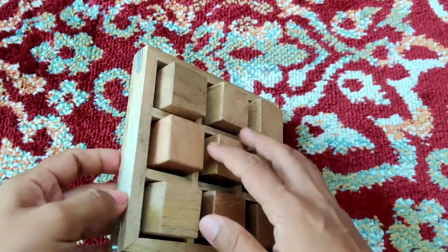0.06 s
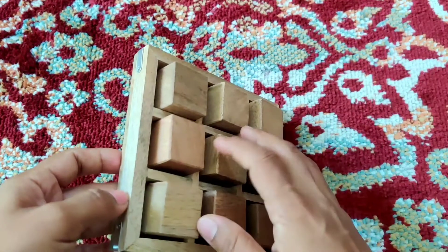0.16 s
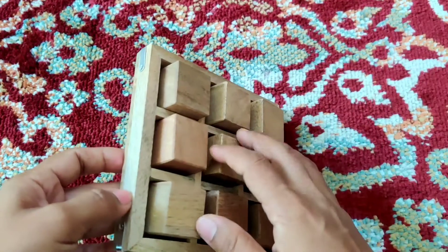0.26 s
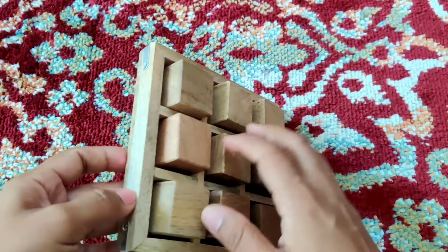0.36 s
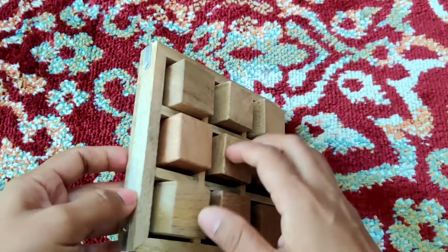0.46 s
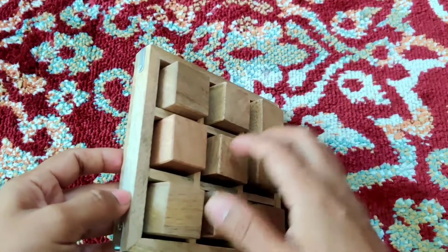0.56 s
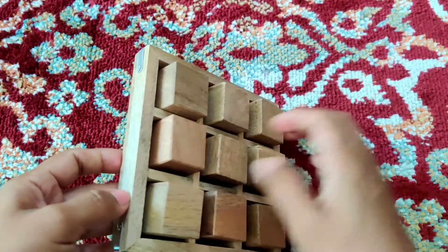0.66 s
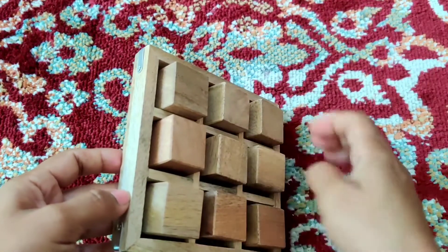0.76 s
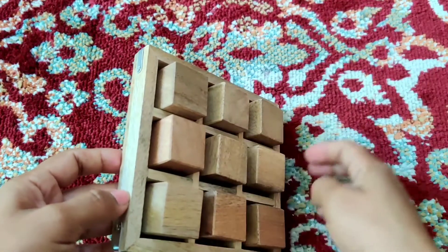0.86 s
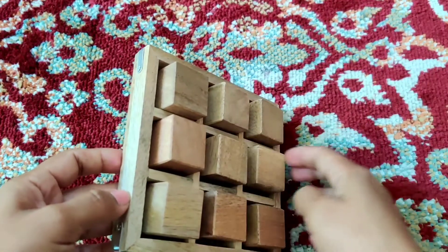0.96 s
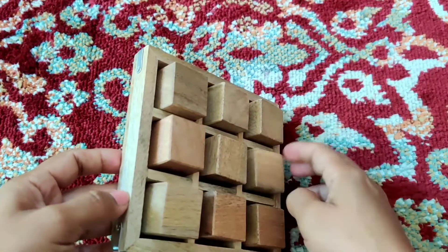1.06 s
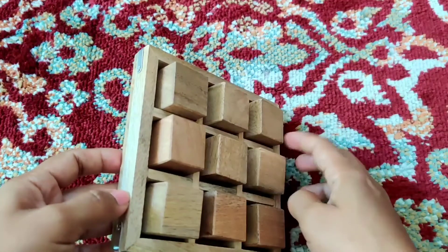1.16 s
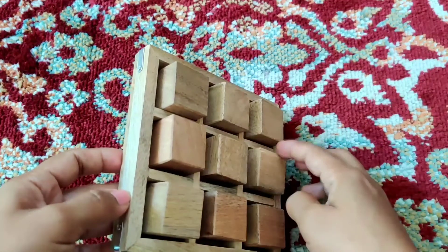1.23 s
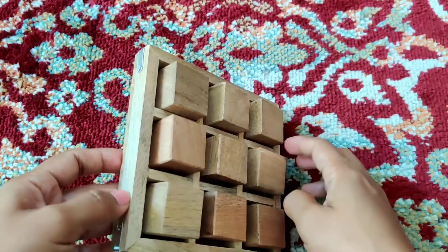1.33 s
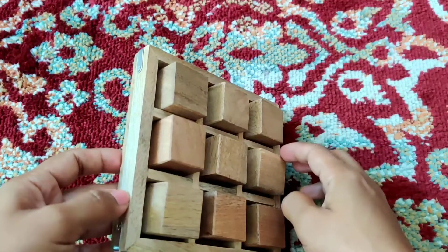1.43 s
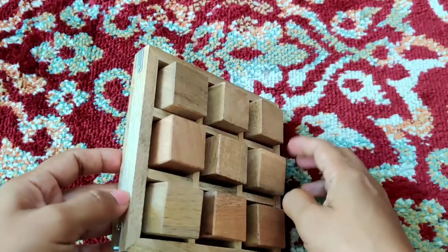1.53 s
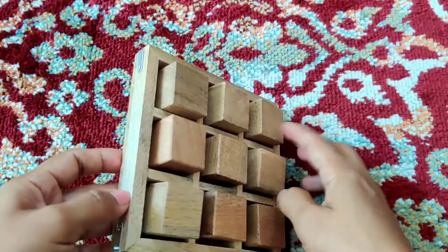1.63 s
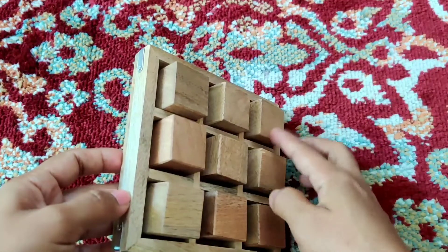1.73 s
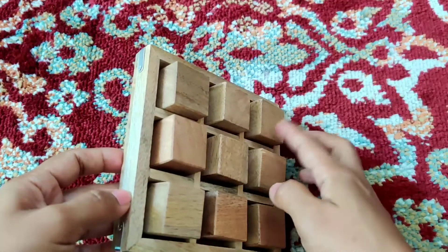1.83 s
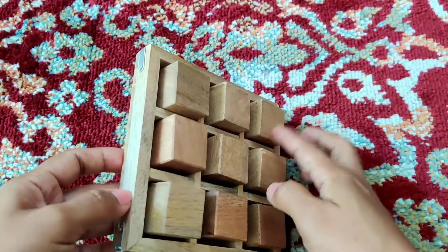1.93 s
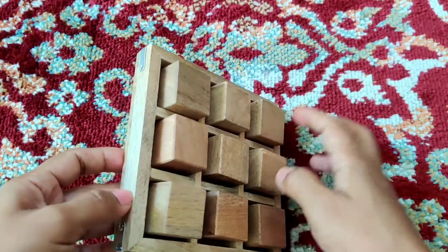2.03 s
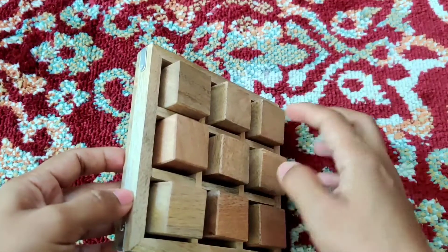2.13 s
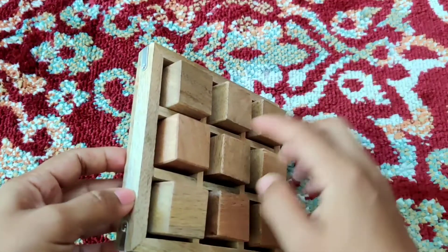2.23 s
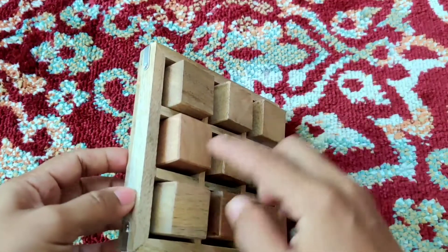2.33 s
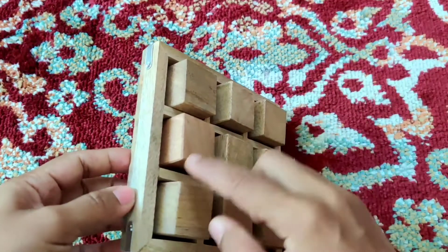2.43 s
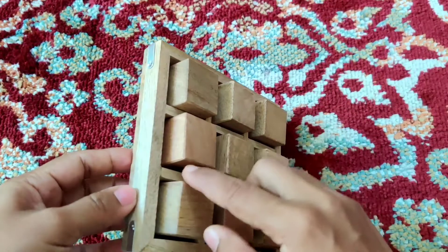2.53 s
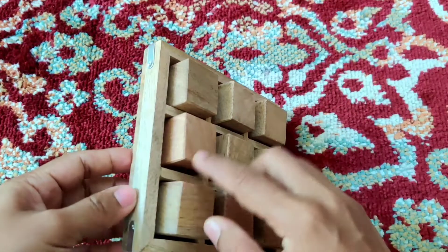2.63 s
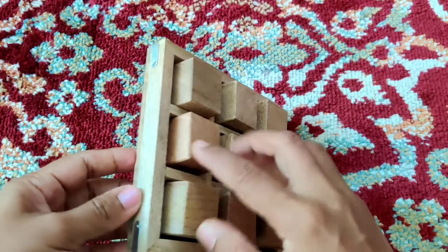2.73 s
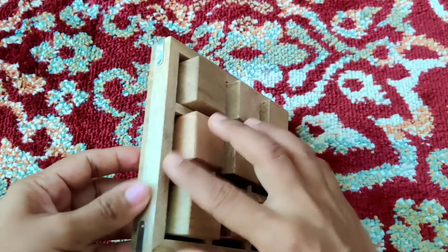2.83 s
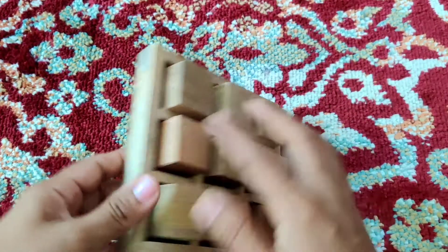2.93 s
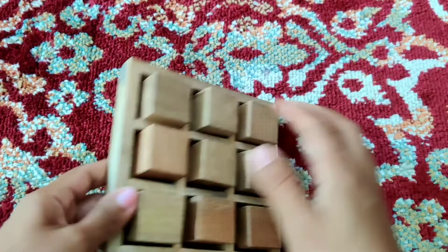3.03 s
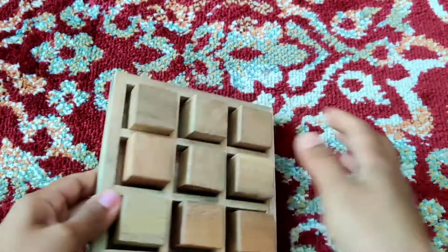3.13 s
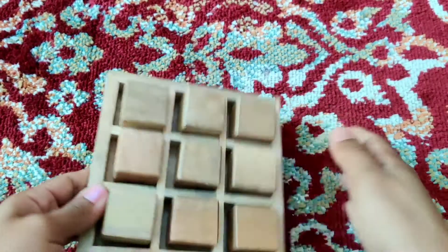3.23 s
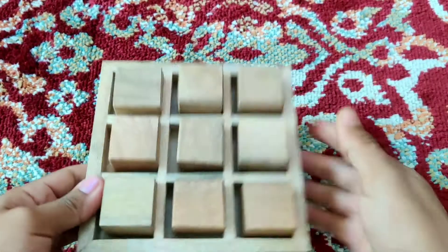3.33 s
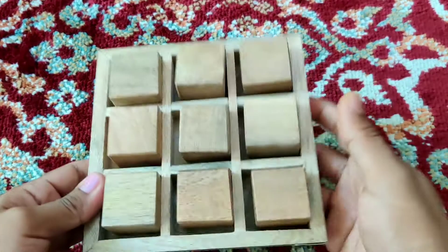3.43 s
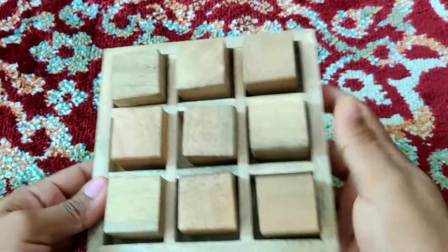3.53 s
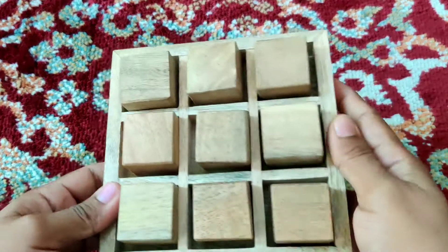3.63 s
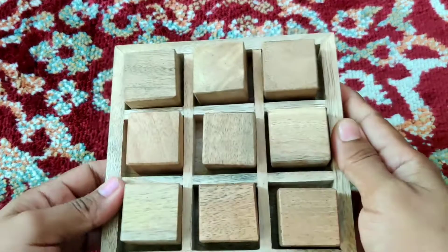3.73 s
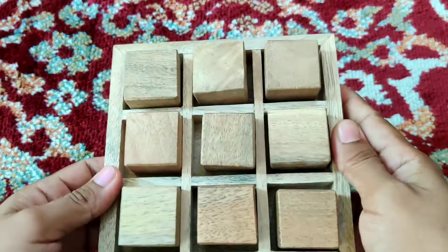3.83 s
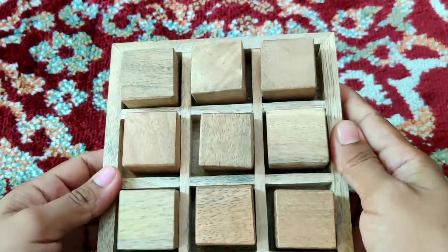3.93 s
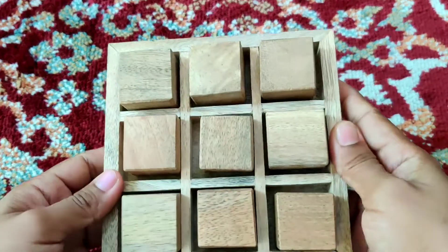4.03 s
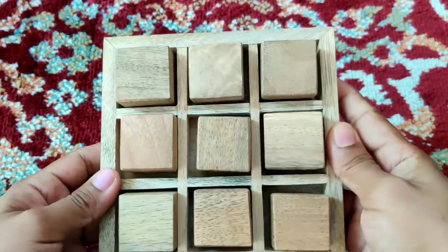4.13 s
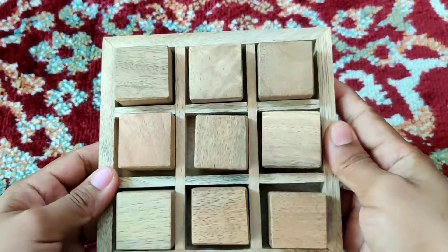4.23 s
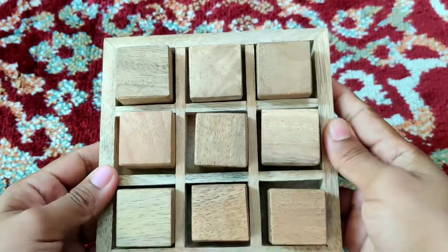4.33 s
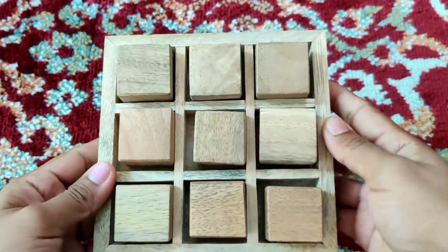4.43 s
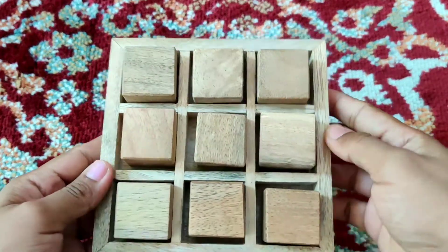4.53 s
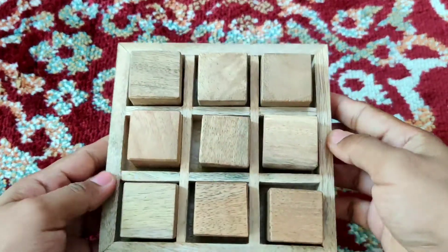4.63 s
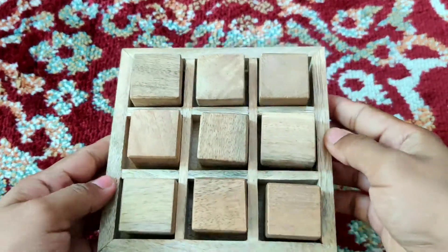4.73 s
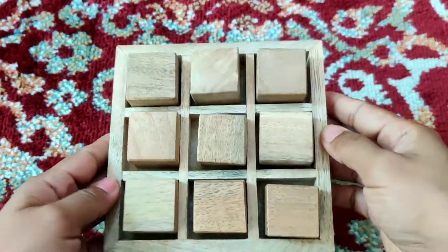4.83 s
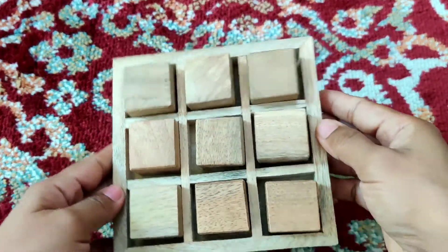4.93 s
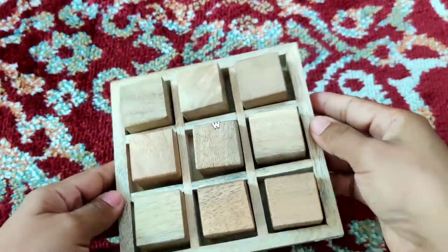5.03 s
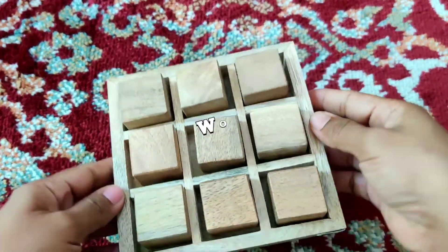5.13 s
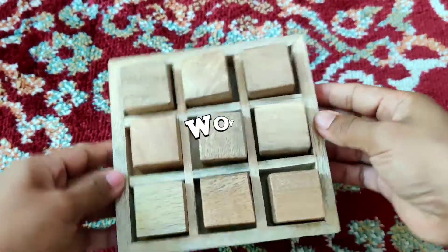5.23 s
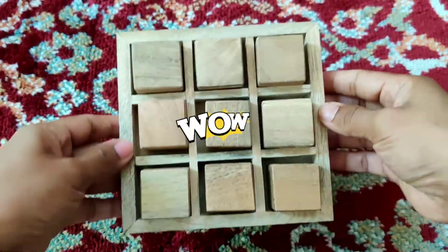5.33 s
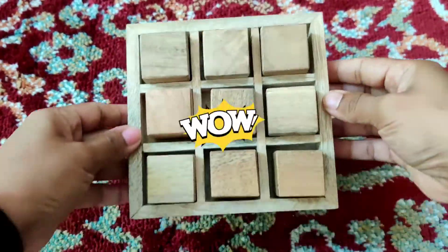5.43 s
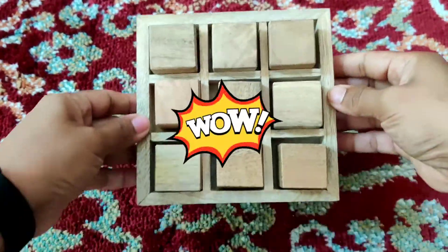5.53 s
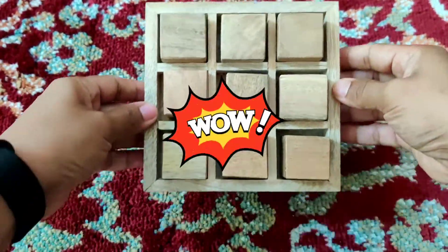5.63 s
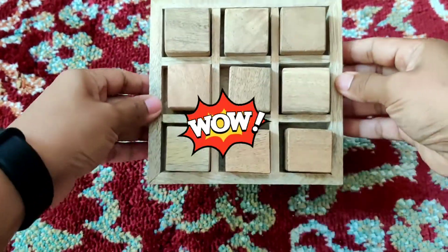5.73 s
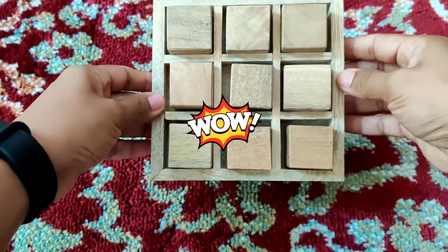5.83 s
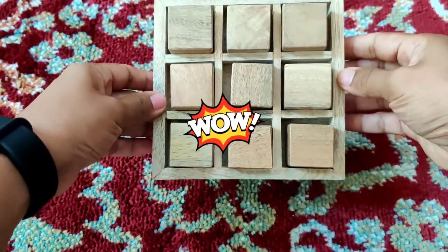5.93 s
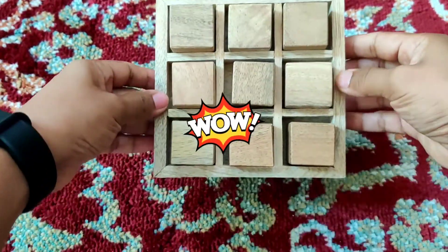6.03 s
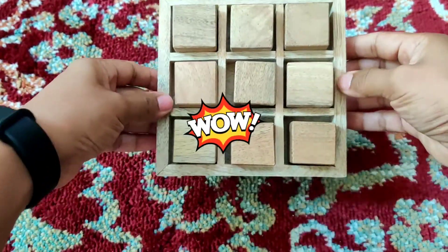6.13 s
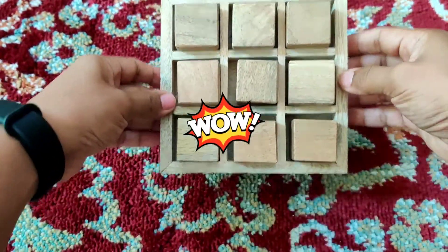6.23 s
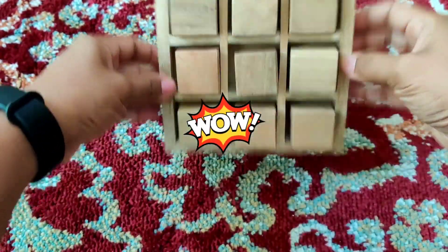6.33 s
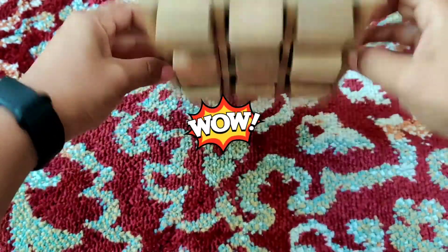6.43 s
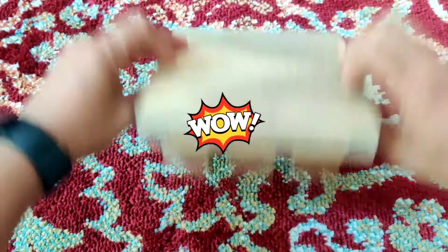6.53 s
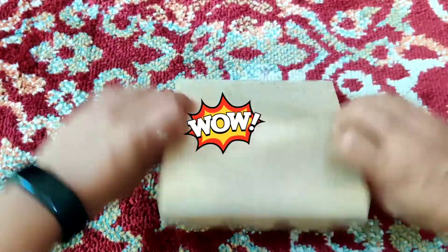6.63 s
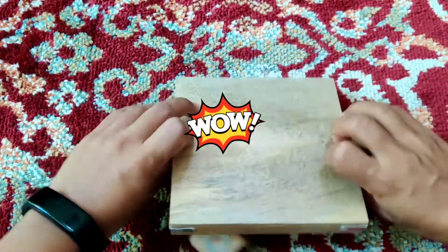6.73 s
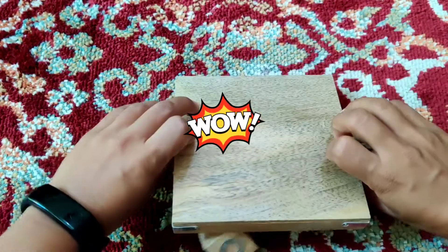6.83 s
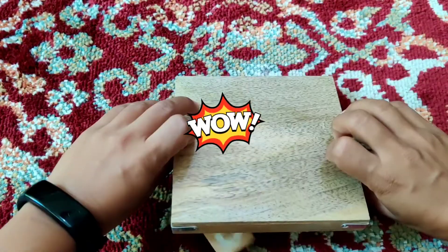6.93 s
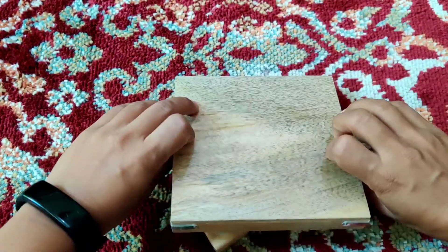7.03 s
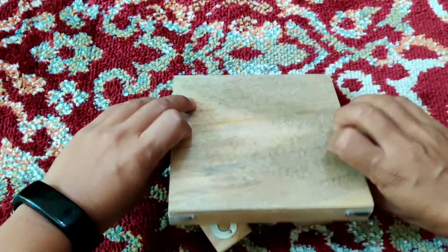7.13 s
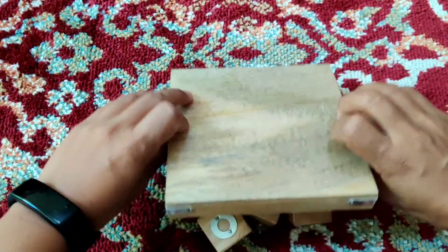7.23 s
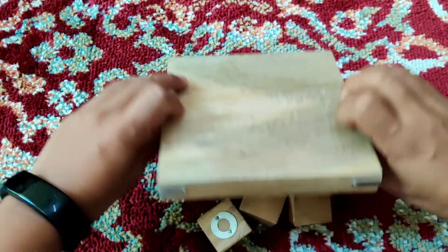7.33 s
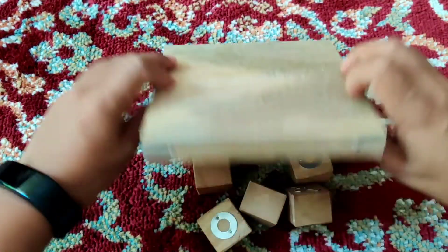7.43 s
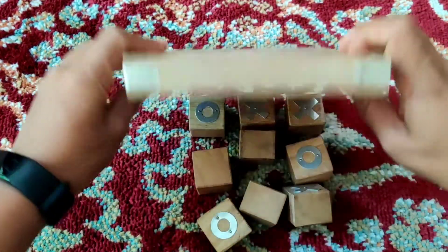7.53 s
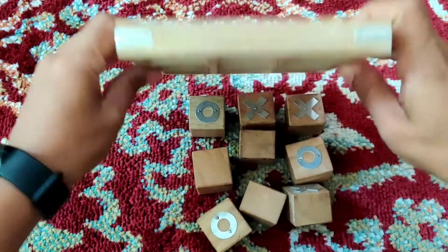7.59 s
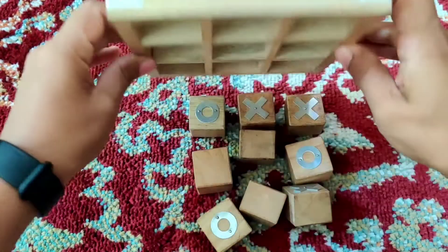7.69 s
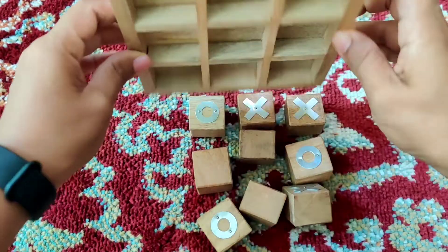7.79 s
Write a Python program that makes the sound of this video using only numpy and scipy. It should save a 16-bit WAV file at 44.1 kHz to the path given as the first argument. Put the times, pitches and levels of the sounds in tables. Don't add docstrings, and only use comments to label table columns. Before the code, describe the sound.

Close view of a wooden tray of loose cubes on carpet in a small humming room. Sparse finger taps and skin rubs come first, then the lifted tray makes a burst of dry clacks. Softer clicks follow as it rocks, then one sharp knock. After a pause it is tipped and turned over, with a loud hollow clatter that quickly dies to small ticks.

```python
import sys
import numpy as np
from scipy import signal
from scipy.fft import rfft, irfft, next_fast_len
from scipy.io import wavfile
from scipy.ndimage import uniform_filter1d

SR = 44100
rng = np.random.default_rng(int(sys.argv[2]) if len(sys.argv) > 2 else 0)


def linear_from_db(decibels):
    return 10 ** (np.asarray(decibels, float) / 20)


def wrap_up_sound(samples):
    columns = np.atleast_2d(samples).T
    tamed = np.clip(columns, -1, 1)
    steps = np.round(tamed * 32767).astype(np.int16)
    wavfile.write(sys.argv[1], SR, steps)


N = 346581
M = next_fast_len(N + 4096)
HZ = np.fft.rfftfreq(M, 1 / SR)
HELD_FROM_S, UPRIGHT_FROM_S, CAVITY_FROM_S, DRUM_FROM_S = 3.3, 5.9, 6.6, 6.7
MID_KNOCK_HZ, MID_KNOCK_DB = 1500, -45


def on_log(points, hz):
    f, v = np.transpose(points)
    return np.interp(np.log(np.maximum(hz, 1)), np.log(f), v)


def level(x, db):
    return x * linear_from_db(db) / np.sqrt(np.mean(x ** 2))


def coloured(x, gain):
    return irfft(rfft(x, M) * gain, M)[..., :N]


def causal(db):
    size = 2048
    cepstrum = irfft(np.interp(np.fft.rfftfreq(size, 1 / SR), HZ, db) * np.log(10) / 20)
    cepstrum[1:size // 2] *= 2
    cepstrum[size // 2 + 1:] = 0
    return rfft(irfft(np.exp(rfft(cepstrum))), M)


def walk(rate_hz):
    hold = int(SR / rate_hz)
    steps = np.repeat(rng.standard_normal(N // hold + 1), hold)
    return uniform_filter1d(steps, hold)[:N]


def two_ports(mid, side, alike):
    return np.sqrt(1 + alike) * mid + np.sqrt(1 - alike) * side * np.array([[1], [-1]])


# Hz, dB per Hz.
AIR = [(15, -43), (28, -12), (55, -15.5), (90, -10), (200, -11.5), (330, -14.5), (450, -16), (1000, -19.5),
       (2000, -26.5), (4000, -35.5), (5500, -41.5), (6700, -39), (8500, -47), (15500, -43.5)]
# Hz, width in Hz, level in dB.
HUM = [(189.3, 24, -73.5), (272.3, 43, -72.5)]
# Hz, share 0-1.
AIR_ALIKE = [(40, .88), (130, .94), (290, .8), (640, .5), (1400, .02)]


def air():
    mid, side = rfft(rng.standard_normal((2, M)))
    pair = two_ports(mid, side, on_log(AIR_ALIKE, HZ))
    out = level(irfft(pair * linear_from_db(on_log(AIR, HZ)), M)[:, :N], -67)
    for hz, width_hz, db in HUM:
        band = 1 / (1 + ((HZ - hz) / width_hz * 2) ** 2)
        out = out + level(irfft(pair * band, M)[:, :N], db) * linear_from_db(1.3 * walk(10))
    return out


# start in seconds, knock in dB, knock pitch in Hz,
# hardness in dB (cube ring over the knock), at times tick over the knock in dB; so to TURN.
TAPS = [(.0025, -54, 1480, -22, -19.5), (.009, -58, 1480, -22, -20), (.0055, -54.5, 2160, -13, -20.5),
        (.0168, -63, 2530, 8, 13), (.5845, -55.5, 2030, -18, -15), (.5833, -49, 1400, -26, -19.5),
        (1.1, -39.5, 1456, -22, -17), (1.1107, -44, 1510, -20, -12), (1.1961, -38.5, 2314, 9.5, 9),
        (1.1966, -41, 1454, -14, -13), (1.2088, -37.5, 1540, 7.5, 7.5), (1.209, -51, 2310, -18, 5),
        (1.2203, -51, 1610, 5, -14), (1.2268, -46, 1480, -37, -30), (3.2375, -44.5, 1570, -20, -11)]
# start in seconds, tick in dB, knock in dB.
NAILS = [(.179, -61.5, -62), (0.5768, -53, -58), (0.739, -53, -68), (1.744, -54, -67), (1.815, -62, -74),
         (1.983, -53.5, -75), (1.9934, -45.5, -60.5), (2.7389, -51.5, -62), (3.6333, -53, -47),
         (3.6456, -51, -45), (3.699, -58, -53), (3.7367, -57, -51.5), (3.74, -54, -58), (3.984, -54.5, -74),
         (4.746, -55, -76), (5.0163, -60, -52), (5.392, -76, -58), (5.7411, -58, -60), (7.7431, -60, -73),
         (7.7546, -60.5, -71)]
TILT = [(3.4391, -57.5, 1200, -3.5), (3.451, -52, 1200, -9), (3.4712, -53, 1160, -32),
        (3.4887, -41.5, 1410, -21), (3.4928, -39, 1700, -20), (3.498, -40, 1730, -22),
        (3.505, -34.5, 1690, -9, -20), (3.5125, -34.5, 1740, -9, -18), (3.5169, -40, 1350, -14, -26),
        (3.52, -41, 1900, -16, -26), (3.5252, -43, 1500, -20), (3.5295, -39, 1400, -12, -25),
        (3.5268, -33, 1425, -9), (3.5325, -45, 850, -28), (3.537, -44, 1300, -20), (3.5415, -46, 1800, -20),
        (3.5496, -61, 850, -21), (3.5994, -39.5, 1790, -14), (3.605, -36, 1680, -25),
        (3.6092, -52, 1690, -3), (3.618, -46, 1760, -22), (3.6287, -44.5, 780, -24),
        (3.6393, -45, 1280, -19), (3.6483, -44, 1490, -10), (3.6534, -40, 1630, -16),
        (3.6608, -47, 1880, -23), (3.6818, -55, 830, -21), (3.6891, -51.5, 990, -7), (3.705, -55, 1400, -9),
        (3.7123, -48, 1130, -20), (3.801, -63, 700, -19.5), (3.813, -53, 696, -16.5),
        (3.822, -57, 735, -17)]
SWAY = [(3.9905, -45, 850, -30), (3.9535, -51, 850, -30), (3.954, -52, 1750, -20), (3.966, -52, 860, -30),
        (3.9665, -49, 1270, -30), (3.996, -52, 1800, -10), (4.0575, -54, 2020, -8), (4.063, -55, 1000, -20),
        (3.9321, -42.5, 1280, -16), (3.937, -42, 1910, -30), (3.942, -48, 1700, -16),
        (3.953, -48, 1280, -14), (3.9657, -52, 1800, -20), (3.99, -42, 1790, -4.5), (4.058, -48, 1060, -12),
        (4.18, -57, 1220, -31), (4.1873, -55.5, 1170, -24), (4.1959, -48.5, 1300, -22),
        (4.2649, -49, 860, -14), (4.2709, -51, 1180, -19), (4.2815, -58, 910, -25), (4.2999, -27, 1700, -6),
        (4.3025, -44, 2120, -16), (4.3113, -56.5, 1510, -4.5), (4.9262, -45, 1850, -18),
        (4.9265, -47, 960, -28), (4.9331, -47.5, 1890, -19), (4.9335, -47, 1000, -28),
        (4.942, -46, 2150, -14), (4.9425, -48, 900, -28), (4.9435, -50, 1500, -20), (4.953, -51, 850, -28),
        (5.011, -53, 800, -28), (5.029, -55, 850, -28), (5.1445, -49, 1050, -24), (5.152, -52, 880, -28),
        (5.0107, -48.5, 1800, -10), (5.0238, -46, 1950, -15), (5.097, -56, 1240, -20),
        (5.1225, -55, 1000, -22), (5.1351, -54, 1000, -15), (5.1441, -44.5, 1950, -14)]
LIFT = [(5.3632, -45, 1780, -26), (5.3698, -52, 850, -14), (5.3741, -47, 1750, -24),
        (5.3805, -49.5, 910, -23), (5.385, -55, 900, -27), (5.4015, -51, 1700, -20),
        (5.4037, -48, 1790, -18), (5.4062, -47.5, 1500, -10), (5.4103, -46.5, 1200, -4),
        (5.4135, -63, 1700, 2), (5.4252, -54, 2030, -8), (5.439, -57, 1900, -20), (5.4423, -53, 1180, -16),
        (5.4445, -51, 1300, -8)]
DROP = [(5.4767, -29, 1970, -2, -12), (5.4787, -24, 1706, -3, -13), (5.479, -31, 2150, -3, -10),
        (5.4895, -39, 2150, -7, -16), (5.4865, -34, 1740, -5.5), (5.4925, -38, 1900, -6),
        (5.4975, -44, 2060, -6), (5.502, -42, 1560, -11), (5.5093, -42, 2150, -5)]
TIP = [(6.0102, -44, 2170, -3.5), (6.0165, -44.5, 2150, -2.5), (6.0226, -52.5, 1100, -14),
       (6.3953, -56, 1820, -12.5), (6.4008, -54, 1900, -14), (6.4062, -48, 2210, -12.5),
       (6.39, -58, 1850, -20), (6.4105, -56, 1800, -20), (6.4143, -52.5, 1840, -14),
       (6.4188, -39, 2160, -8), (6.4262, -48, 2460, 1.5), (6.4299, -40, 2080, -10.5),
       (6.4328, -40.5, 2300, -8.5), (6.4388, -36, 1980, -3.5), (6.4418, -47, 2300, -12),
       (6.4455, -49, 1702, -14), (6.4495, -51, 1400, -16), (6.457, -52.5, 2230, -12)]
TURN = [(6.7062, -30.5, 1486, -16, -17), (6.7085, -44, 2120, -10, -16), (6.7105, -40, 1500, -14, -25),
        (6.7145, -43, 1350, -16, -30), (6.722, -48, 620, 3, 4), (6.729, -46.5, 620, 2, 4),
        (6.7406, -11.5, 1312, -14), (6.742, -17.5, 1340, -1), (6.7446, -12, 2250, -8, -12),
        (6.7465, -30, 2300, 11, 4), (6.7538, -11.5, 1306, -14), (6.7555, -18, 1340, -4, -12),
        (6.7574, -11.5, 2256, -8, -12), (6.7597, -30, 2300, 13, 5), (6.7618, -19, 1400, -4, -16),
        (6.7645, -21, 1500, -4, -14), (6.7661, -16.5, 1395, -9, -18), (6.7665, -22, 2200, -6, -18),
        (6.7705, -21, 1450, -8, -20), (6.7845, -24, 1150, -10, -24), (6.7872, -22.5, 1200, -19),
        (6.794, -46, 2300, 13, -4), (6.8025, -48, 2300, 14, -4), (6.809, -38, 2210, -1, -8),
        (6.849, -40, 700, -8, -20), (6.8568, -36, 1470, -6, -12), (6.8628, -33, 1500, -8, -12),
        (6.911, -52, 1400, 3, -8), (7.019, -51, 1380, -1, -8)]
# start in seconds, knock in dB.
BOUNCES = [(6.7767, -17.5), (6.7906, -13), (6.7998, -15), (6.8078, -23.5), (6.8135, -25.5), (6.8171, -25.5),
           (6.8232, -18), (6.8286, -24.5), (6.8365, -28), (6.8445, -28), (6.8395, -32), (6.876, -36),
           (6.882, -37), (6.891, -39), (6.903, -39), (6.926, -42), (6.945, -45), (6.97, -46), (7.012, -51),
           (7.025, -49), (7.0602, -47.5), (7.0794, -51.5), (7.236, -53.5), (7.247, -58), (7.268, -53.5),
           (7.319, -60.5)]
VOICE = {"nail": (-2.9, .95, 0.1, 0, 0), "tap": (-54, -1.6, 19, -0.5, 0.79),
         "tilt": (-4, 0.83, 1.5, 5, 3.5), "sway": (-12, 0, 9, -13.5, 1), "lift": (-13, 0, 10, -2.5, 2.8),
         "drop": (-21, 0.33, 0, -4, 3), "tip": (-16, 0.8, 0.5, -9.5, 1.2),
         "turn": (-21, 1.1863, 3, -5.5, 2.4), "bounce": (-17.5, 0.7936, -1.3, -13.5, 0.9)}
FRAME_DB = {"nail": -19, "tap": -31, "tilt": -17.5, "sway": -22, "lift": -18, "drop": -3.5, "tip": -30,
            "turn": -31.5, "bounce": -39.5}


def contacts():
    hits = []
    for s, tick_db, db in NAILS:
        hits.append((s, db + VOICE["nail"][0], FRAME_DB["nail"], 1300, db, tick_db - 13, tick_db))
    bounces = []
    for s, db in BOUNCES:
        hz = min(1305 + 1500 * (s - BOUNCES[0][0]), 1430)
        bounces.append((s, db, hz, -20.5))
    handlings = {"tap": TAPS, "tilt": TILT, "sway": SWAY, "lift": LIFT, "drop": DROP, "tip": TIP,
                 "turn": TURN, "bounce": bounces}
    for name, rows in handlings.items():
        thud_db, per_db, per_octave, tick_db, per_hard = VOICE[name]
        for s, db, hz, hard_db, *own_tick_db in rows:
            thud = MID_KNOCK_DB + thud_db + per_db * (db - MID_KNOCK_DB)
            thud += per_octave * np.log2(hz / MID_KNOCK_HZ)
            tick = db + (own_tick_db[0] if own_tick_db else tick_db + per_hard * hard_db)
            hits.append((s, thud, FRAME_DB[name], hz, db, db + hard_db, tick))
    return hits


def ring(modes, t, chance, rise_s, detune, scatter_db, neighbour=0.87):
    hz, db, t60 = np.transpose(modes)[:, :, None]
    pitch_chance, level_chance = chance[:2, :len(modes), None]
    rank = np.argsort(np.argsort(hz, axis=0), axis=0)
    sign = neighbour ** rank
    waves = np.sin(2 * np.pi * hz * (1 + detune * pitch_chance) * t)
    waves = sign * linear_from_db(db + scatter_db * level_chance) * waves
    x = np.sum(waves * np.exp(-np.log(1000) * t / t60), axis=0) * (1 - np.exp(-t / rise_s)) ** 2
    return x / np.abs(x).max()


# multiple of the knock pitch, level in dB, t60 in seconds.
PROPPED_KNOCK = [(0.974, 3.5, 0.013), (1.045, -11, 0.085), (0.9, -20.5, 0.031)]
HELD_KNOCK = [(1, 0, .02), (1.1, -8, .014), (.88, -11, .012), (1.25, -11, .009)]
DRUM_KNOCK = [(1, 3.5, .016), (1.06, -6, .022), (.92, -14.5, .014), (1.85, -18.5, 0.011)]
# Hz, level in dB, t60 in seconds; so to TICK.
PROPPED_CUBE = [(3385, 0, .011), (3750, -8, .008), (2900, -11, .007), (5400, -16, .006), (4250, -10, .007)]
HELD_CUBE = [(4020, -4, 0.012), (3450, -2, 0.008), (2690, -8, 0.006), (5000, 1, .005), (4200, 4, 0.004)]
UPRIGHT_CUBE = [(3700, -2, 0.013), (5096, 1.5, .009), (2700, -7, .007), (7040, -6.5, .009),
                (4700, -7, .006)]
DRUM_CUBE = [(3430, 1, .013), (3720, -4, .011), (2620, -10, .009), (4970, -2, .012), (4350, -9.5, .006)]
OPEN_THUD = [(610, -4, .012), (838, 5, 0.013), (1045, 1, 0.021)]
DRUM_THUD = [(630, 2, 0.018), (518.4, -16, 0.0089), (762, -5, 0.0202), (990, -13, 0.03)]
FRAME = [(1570, 0, .085), (1690, -1, .05), (2147, 0, .09), (1270, -11, .035), (1460, -8, .04)]
TICK = [(6635, -2, 0.011), (7980, -10, .006), (6050, -6.5, .005), (5470, -10, .004), (9200, -28, .004)]


def strike(at, thud_db, frame_db, hz, chance, t):
    thud, damp = OPEN_THUD, 0.9
    if at > DRUM_FROM_S:
        family, cube, thud, damp, rise_s = DRUM_KNOCK, DRUM_CUBE, DRUM_THUD, 1.6, .0016
    elif at > UPRIGHT_FROM_S:
        family, cube, damp, rise_s = HELD_KNOCK, UPRIGHT_CUBE, 1.6, .0006
    elif at > HELD_FROM_S:
        family, cube, rise_s = HELD_KNOCK, HELD_CUBE, .0004
    else:
        family, cube, rise_s = PROPPED_KNOCK, PROPPED_CUBE, .0003
    modes = np.array(family) * [hz, 1, (MID_KNOCK_HZ / hz) ** damp]
    knock = ring(modes, t, chance[1], rise_s, .006, 1.5)
    knock += linear_from_db(frame_db) * ring(FRAME, t, chance[0], .0004, .004, 3)
    knock += linear_from_db(thud_db) * ring(thud, t, chance[0], .0008, .03, 2)
    cube_ring = ring(cube, t, chance[2], .0002, .008, 2, -1.)
    tick = ring(TICK, t, chance[3], .0001, .008, 2, -1.)
    return np.array([knock, cube_ring, tick])


# time in seconds, left minus right in dB of knock, of cube, of tick,
# right lag in samples.
PLACE = [(0, 2.5, 8, 8, 3), (3.3, 3, 7, 7, 3), (3.5, 3, 5, 4, 2), (6.1, 2.5, 4, 3, 2), (6.35, 0, 0, -1, 0),
         (6.74, -.5, 1, 2, 2), (7.0, .5, 1, 1, 1), (7.9, 1, 5, 6, 0)]
# Hz, dB.
CRUNCH = [
    [(400, -72.5), (900, -22), (1500, -11), (2300, -5.5), (4000, -80)],
    [(1500, -85), (2700, -7.5), (4000, -14.5), (5500, -13), (8000, -80)],
    [(3500, -80.5), (5800, -15.5), (7500, -23.5), (9500, -30.5), (12000, -31), (15000, -37)],
]


def blocks():
    hits = contacts()
    out, crunch = np.zeros((2, M)), np.zeros((3, 2, M))
    chances = rng.standard_normal((len(hits), 4, 2, 5))
    grits = rng.standard_normal((len(hits), 3, 512))
    repeats = rng.random((len(hits), 3))
    place_s, *place = np.transpose(PLACE)
    t = np.arange(2560) / SR
    for (at, thud_db, frame_db, hz, *dbs), chance, grit, where in zip(hits, chances, grits, repeats):
        *pans_db, lag = (np.interp(at, place_s, p) for p in place)
        drum = at > DRUM_FROM_S
        rings = strike(at, thud_db - dbs[0], frame_db, hz, chance, t)
        if HELD_FROM_S < at < DRUM_FROM_S:
            rings = chatter(rings, where, dbs[0])
        grit = grit * np.exp(-t[:grit.shape[1]] / (.002 if drum else .00027))
        grit = grit * linear_from_db(drum * np.array([-4.5, 1, 9]))[:, None]
        for side, sign in enumerate((1, -1)):
            gain = linear_from_db(np.array(dbs) + sign * np.array(pans_db) / 2)[:, None]
            i = int(at * SR + side * lag)
            out[side, i:i + len(t)] += np.sum(gain * rings, axis=0)
            i -= side * drum
            crunch[:, side, i:i + grit.shape[1]] += gain * grit
    grit_sum = sum(coloured(x, causal(on_log(colour, HZ) + 10)) for x, colour in zip(crunch, CRUNCH))
    return out[:, :N], grit_sum


# Hz, t60 in seconds, level in dB.
ROOM = [(350, .9, -21), (706, 0.48, -16), (1400, .5, -21), (2202, 0.4, -19.5), (3170, 0.6, -20),
        (4966, 0.65, -22), (6640, 0.62, -30), (11000, 0.886, -31)]
# Hz, share 0-1.
ROOM_ALIKE = [(600, .9), (1400, .8), (2500, .4), (5000, .03)]
ROOM_TURNS_S = [3.3, 4.6, 5.45, 5.485, 5.9, 6.6, 6.752, 6.774]


def room(x):
    t, hz = np.arange(SR) / SR, np.fft.rfftfreq(SR, 1 / SR)
    octave, centres = np.log2(np.maximum(hz, 1)), np.log2(np.array(ROOM)[:, 0])
    delay_s, build_s = .0059, .005
    build = 1 - np.exp(-np.maximum(t - delay_s, 0) / build_s)
    alike = on_log(ROOM_ALIKE, hz).clip(0, 1)
    edges = [0] + [int(s * SR) for s in ROOM_TURNS_S] + [N]
    out = np.zeros((2, N + SR))
    for a, b in zip(edges, edges[1:]):
        noise, tail = rng.standard_normal((2, SR)) * build, 0
        for k, (_, t60, db) in enumerate(ROOM):
            decay = np.exp(-np.log(1000) * t / t60) / np.sqrt(t60 * SR / 14)
            band = np.interp(octave, centres, np.arange(len(ROOM)) == k)
            tail = tail + linear_from_db(db + 4.5) * band * rfft(noise * decay)
        echoes = irfft(two_ports(tail[0], tail[1], alike), SR) * (t < 0.9)
        out[:, a:b + SR - 1] += signal.fftconvolve(x[1:, a:b], echoes, axes=1)
    return out[:, :N]


# start in seconds, length in seconds, level in dB.
RUB = [(.01, 0.042, -72.5), (0.577, 0.013, -69), (0.727, .1, -75), (1.736, 0.071, -73.5),
       (1.804, 0.04, -74.5), (2.337, 0.048, -83), (2.723, 0.13, -72.5), (2.955, 0.027, -77),
       (3.056, 0.095, -74), (3.25, 0.068, -80), (3.476, 0.31, -71.5), (3.72, 0.13, -73.5),
       (3.88, 0.15, -75.5), (4.048, 0.054, -74.5), (4.128, 0.083, -72.5), (4.25, 0.045, -75),
       (4.476, 0.33, -71), (4.728, 0.18, -76.5), (4.918, 0.045, -70), (4.995, 0.073, -76),
       (5.087, 0.18, -80.5), (5.293, 0.14, -75), (5.391, 0.078, -68), (5.588, 0.19, -76.5),
       (5.728, 0.17, -76), (6.126, 0.045, -80), (6.189, .015, -79), (6.39, 0.12, -68),
       (7.016, 0.037, -69.5), (7.733, 0.081, -72)]
# Hz, dB.
RUB_COLOUR = [(800, -2), (2000, -3.5), (3500, -5.5), (5000, -3.5), (6000, -6), (6600, 3), (7200, -6),
              (10000, -15), (14000, -18.5)]


def fingers():
    t, press = np.arange(N) / SR, np.zeros(N)
    for at, length_s, db in RUB:
        u = np.clip((t - at) / length_s, 0, 1)
        press += linear_from_db(db) * np.minimum(u / 0.025, 1) * (1 - u) ** 0.48
    slips = rng.standard_normal((2, N)) * linear_from_db(rng.exponential(size=N) + 2 * walk(63))
    skin = level(coloured(slips, linear_from_db(on_log(RUB_COLOUR, HZ))), 0)
    return skin * press * linear_from_db(np.array([[2.0], [-2.0]]))


def chatter(x, where, knock_db):
    out = x.copy()
    first_db = -19 - 0.24 * max(knock_db - MID_KNOCK_DB, 0)
    for u in where:
        lag = int((0.05 + 1.1 * u) * .022 * SR)
        out[:, lag:] += linear_from_db(first_db - 10.5 * u) * x[:, :-lag]
    return out


# time in seconds, level in dB.
STIR = [(6.599, -64), (6.676, -92), (6.712, -66), (6.912, -58.5), (7.265, -73.5), (7.5, -70)]


def landing():
    s, db = np.transpose(STIR)
    band = 1 / (1 + (HZ / 220) ** 4) / (1 + (45 / np.maximum(HZ, 1)) ** 4)
    low = coloured(rng.standard_normal(N), band)
    return level(low, 0) * linear_from_db(np.interp(np.arange(N) / SR, s, db, left=-120, right=-120))


# Hz, width in Hz, gain in dB.
CAVITY = [(1790, 160, -9.5), (5720, 450, -11.5), (4950, 250, 0.5), (4100, 200, -4.5), (530, 120, -0.5),
          (15000, 7600, -3.5)]


def cavity(x):
    late = np.arange(N) > CAVITY_FROM_S * SR
    db = sum(db / (1 + ((HZ - hz) / width_hz * 2) ** 2) for hz, width_hz, db in CAVITY)
    return x * ~late + coloured(x * late, causal(db))


# Hz, left minus right in dB.
PORTS = [(2500, 0), (4000, -2), (5000, 3), (6400, 7), (7600, -2), (11000, -6)]


def scene():
    rings, grit = (cavity(x) for x in blocks())
    propped = np.arange(N) < HELD_FROM_S * SR
    sent = linear_from_db(-10.5 * propped) * rings + linear_from_db(9.5 + 2 * propped) * grit
    direct = coloured(rings + grit, linear_from_db(on_log(PORTS, HZ) * np.array([[0], [-1]])))
    return direct + room(sent) + fingers() + landing() + air()


def roll_off(x):
    return signal.sosfilt(signal.butter(12, 15820, fs=SR, output="sos"), x)


def record(dry):
    mix = coloured(dry, HZ < 15600)
    return roll_off(mix)


dry = scene()
out = record(dry)
wrap_up_sound(out)
```